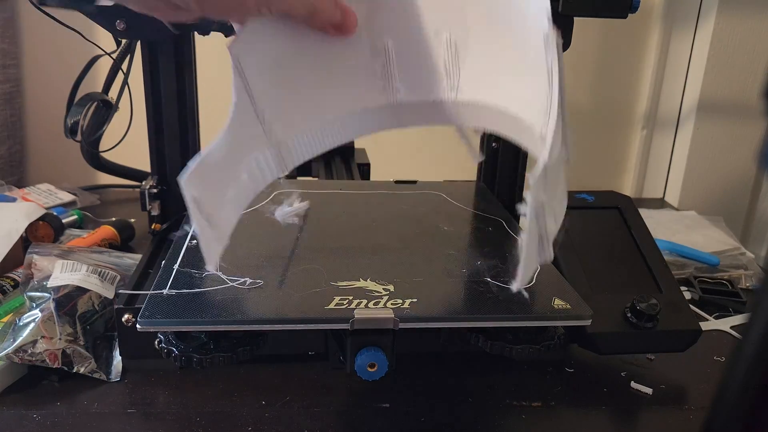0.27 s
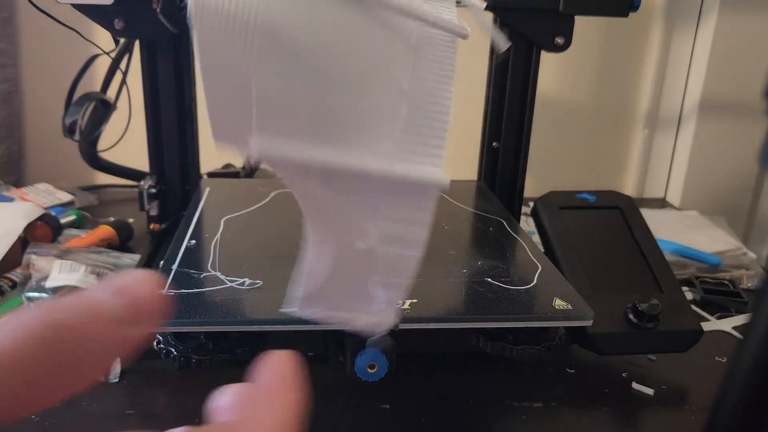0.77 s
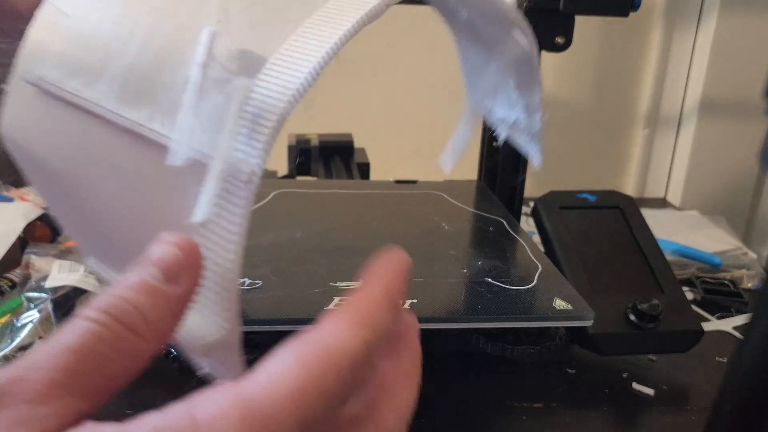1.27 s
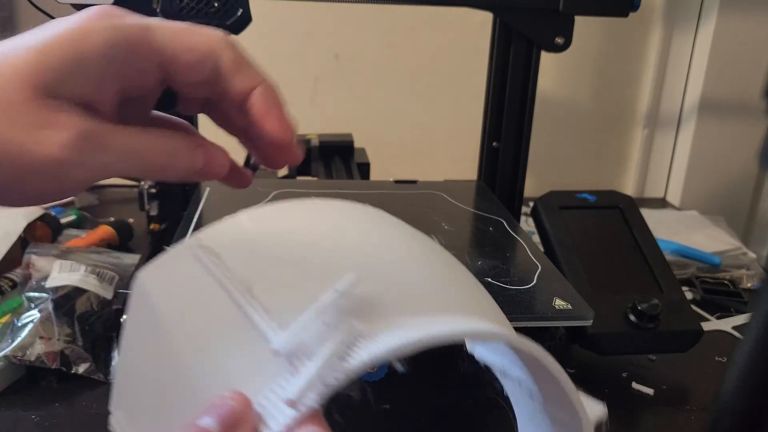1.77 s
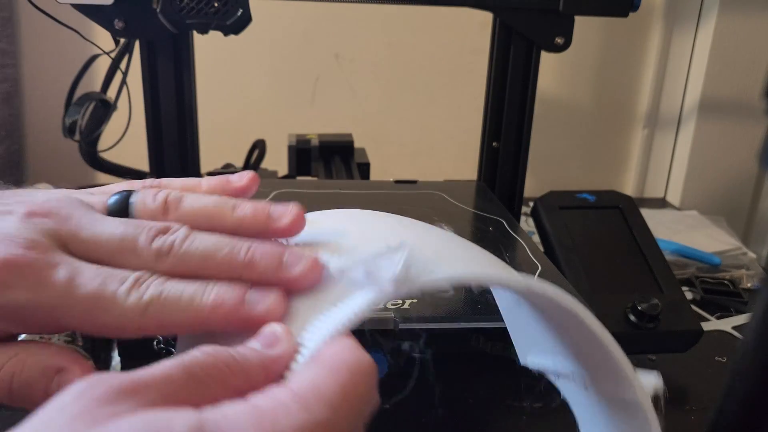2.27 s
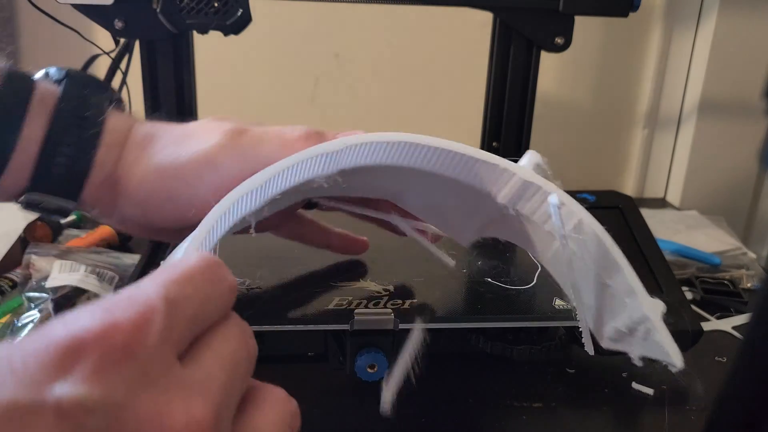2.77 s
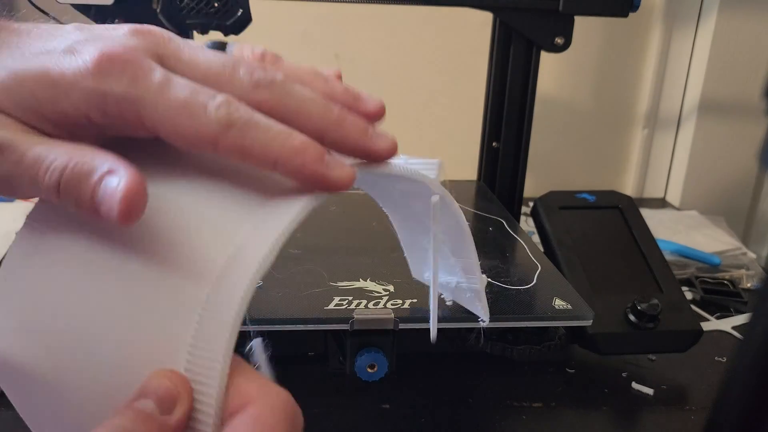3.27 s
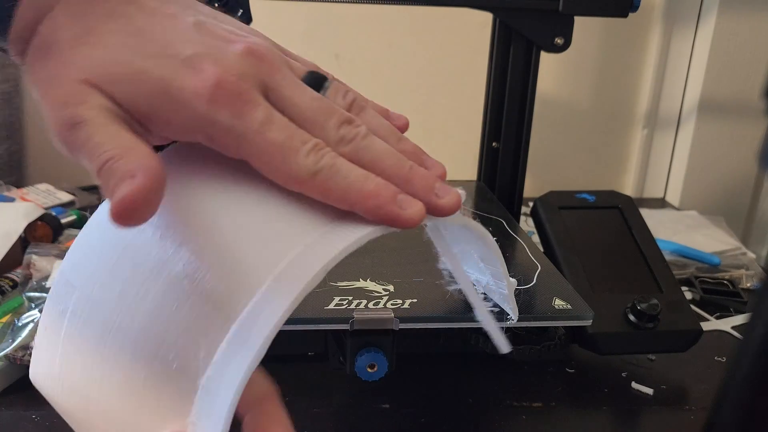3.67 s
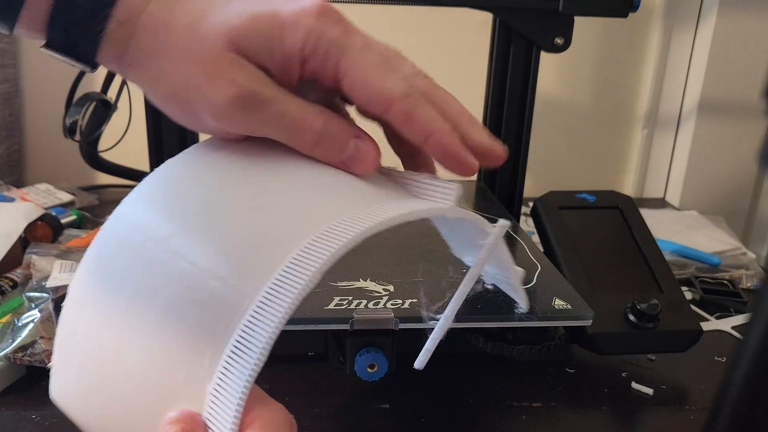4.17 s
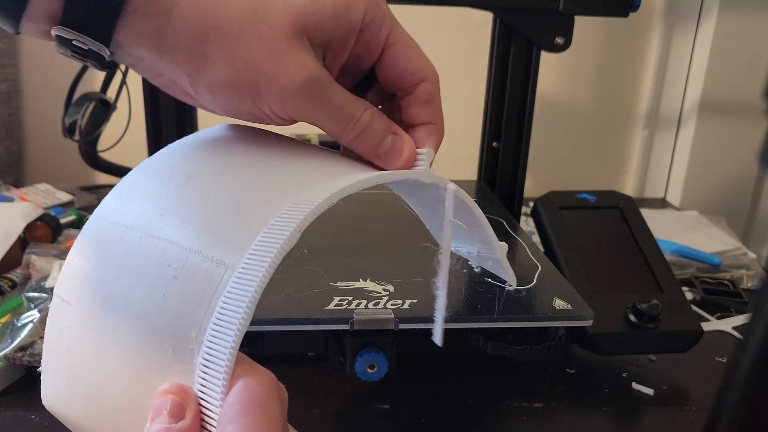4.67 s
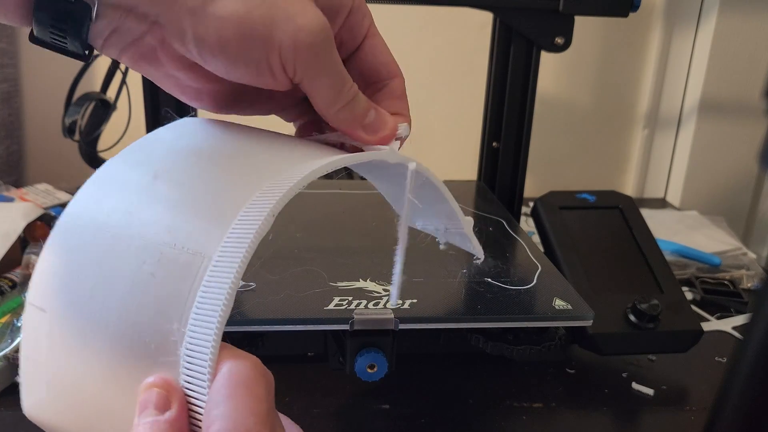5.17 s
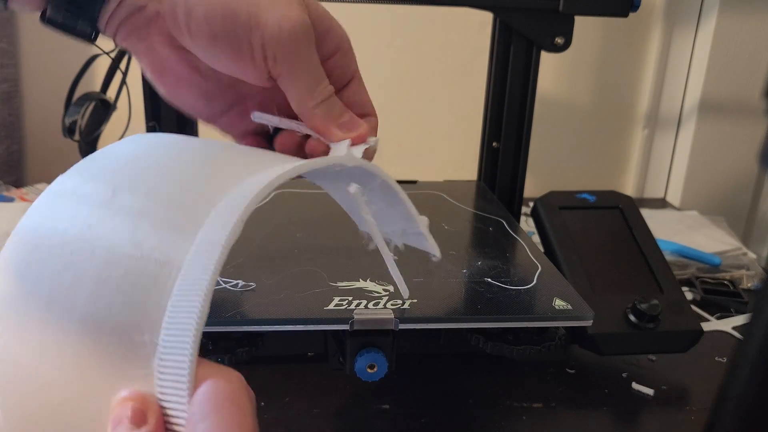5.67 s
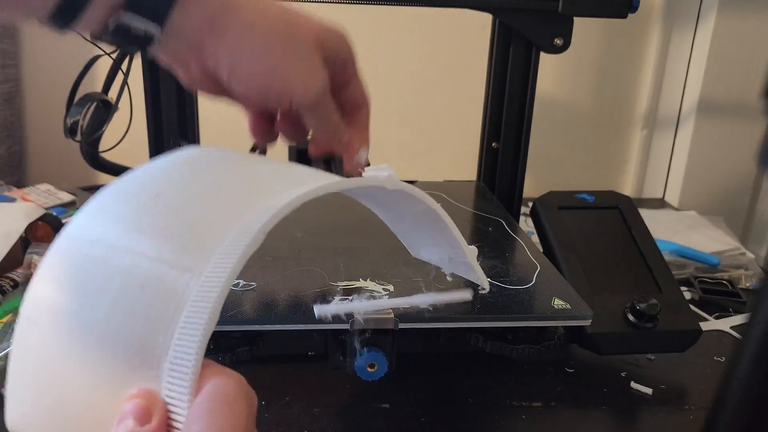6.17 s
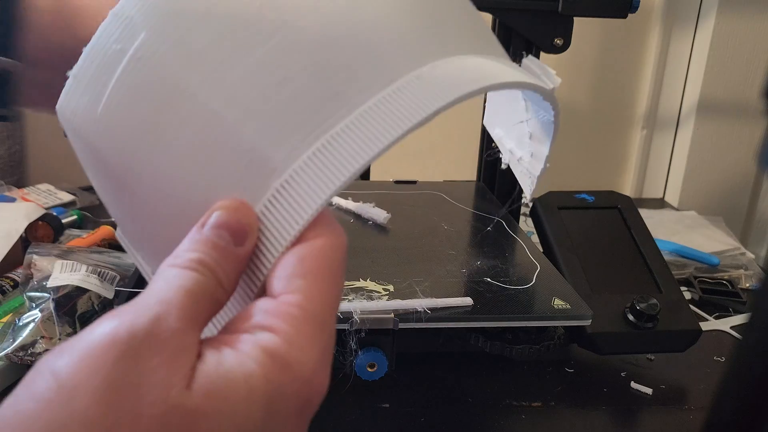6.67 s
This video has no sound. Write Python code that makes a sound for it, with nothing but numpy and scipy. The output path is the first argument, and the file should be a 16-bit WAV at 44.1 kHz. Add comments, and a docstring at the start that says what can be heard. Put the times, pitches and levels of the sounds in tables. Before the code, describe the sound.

Hands flex a thin plastic shell up close in a small room, brittle support strands ticking, snapping and finally cracking in loud, sharp bursts.

```python
"""Hands turn a thin printed plastic shell up close; the small room rumbles, hums and whines throughout.
Support strands tick at first, snap near 1.1 s and again from 2.3 to 3.4 s: clicks and bursts ring strand and shell.
Skin strokes hiss as rough noise and fingertips thump as decaying sines; ticks then thin out.
From 4.3 to 5.3 s a metal wrist strap clinks faintly, as narrow ringing noise.
The hardest snaps run from 5.2 to 6 s, then small cracks close the scene. The hands sit a little to the left."""
import sys
import numpy as np
from scipy import signal
from scipy.fft import rfft, irfft, next_fast_len
from scipy.io import wavfile
from scipy.ndimage import uniform_filter1d, map_coordinates

SR = 44100
rng = np.random.default_rng(int(sys.argv[2]) if len(sys.argv) > 2 else 0)


def store_pcm(level_fs):
    """Save levels as 16-bit WAV."""
    pcm = np.round(np.clip(level_fs, -1, 1) * 32767).astype(np.int16)
    wavfile.write(sys.argv[1], SR, np.atleast_2d(pcm).T)


N = 305613  # length [samples]


def amp(db):
    """Gain of a level in dB."""
    return 10 ** (np.asarray(db) / 20)


def unit(x):
    """x scaled to rms 1."""
    return x / np.sqrt(np.mean(x ** 2) + 1e-20)


def lean_left(db):
    """Channel gains: left up by db, right down by db."""
    return amp([[db], [-db]])


def along(points, hz):
    """(frequency, value) points read on a log frequency axis."""
    f, v = np.transpose(points)
    return np.interp(np.log(hz + 1), np.log(f + 1), v)


def wobble(rate):
    """A smooth random curve with rate knots a second."""
    knots = rng.standard_normal(int(N * rate / SR) + 4)
    return map_coordinates(knots, [np.arange(N) * rate / SR])


def filtered(x, response):
    """x shaped by a response given as a function of frequency."""
    m = next_fast_len(x.shape[-1] + 8192)
    spectrum = rfft(x, m) * response(np.fft.rfftfreq(m, 1 / SR))
    return irfft(spectrum, m)[..., :x.shape[-1]]


def colour(points):
    """Response that follows (frequency, level) points."""
    return lambda hz: amp(along(points, hz))


def resonances(modes):
    """Causal response of (frequency, width, level) modes, with alternating signs."""
    def response(f):
        total = 0
        for k, (centre, width, db) in enumerate(modes):
            damping = 1j * f * width
            total = total + (-1) ** k * amp(db) * damping / (centre ** 2 - f ** 2 + damping)
        return total
    return response


def pair(length, alike):
    """Left and right noise sharing the fraction alike of their power."""
    common, left, right = rng.standard_normal((3, length))
    alike = np.clip(alike, 0, 1)
    return np.sqrt(alike) * common + np.sqrt(1 - alike) * np.array([left, right])


# Relative spectrum of the room noise: (frequency [Hz], level [dB per Hz])
AIR_SPECTRUM = [(20, -19), (60, 1), (114, -3), (183, -9), (280, -2), (330, -15.5), (500, -12), (760, -18),
                (850, -23.5), (1230, -21), (2040, -25), (3100, -23.5), (5700, -34), (7400, -28),
                (9700, -43.5), (15000, -32.5), (15850, -42.5), (16150, -76)]
# Left-right correlation of the room noise: (frequency [Hz], correlation [-1 to 1])
AIR_LIKENESS = [(60, 1), (290, 0.81), (700, 0.055), (1500, 0.011), (15000, 0.28)]
# Room noise over time, before the trim: (time [s], level [dB])
RUMBLE_LEVEL = [(0.0, -57), (0.63, -61.5), (3.4, -62.5), (3.57, -57.5), (4.11, -62.5), (4.86, -64.5),
                (5.4, -62.5), (5.98, -61), (6.43, -65.5), (6.93, -63.5)]
# Fuzzy hum bands, before waver and panning: (frequency [Hz], width [Hz], level [dB rms])
HUM_BANDS = [(55.7, 8, -68.5), (113.2, 7.2, -72.5), (216.5, 24, -77.5), (269, 50, -87.5),
             (368.5, 28, -74.5)]
AIR_TRIM_DB, HUM_WAVER_DB = 1.0, 3.5
WHINE_HZ, WHINE_DB = 723, -75  # level before waver and panning


def room_noise():
    """Rumble near mono with wider hiss above; resonant noise bands hum and one faint sine whines."""
    t = np.arange(N) / SR

    def mid_side(hz):
        angle = np.arccos(np.clip(along(AIR_LIKENESS, hz), -1, 1)) / 2
        return colour(AIR_SPECTRUM)(hz) * [np.cos(angle), np.sin(angle)]

    mid, side = filtered(rng.standard_normal((2, N)), mid_side)
    air_db = np.interp(t, *np.transpose(RUMBLE_LEVEL)) + AIR_TRIM_DB
    air = amp(air_db) * unit(np.array([mid + side, mid - side]))
    hum = 0
    for hz, width, db in HUM_BANDS:
        band = filtered(pair(N, 0.86), lambda f: resonances([(hz, width, 0)])(f) ** 2)
        hum = hum + amp(db + HUM_WAVER_DB * wobble(6)) * unit(band)
    whine_level = amp(WHINE_DB + 1.7 * wobble(5.8))
    whine = whine_level * np.sin(2 * np.pi * WHINE_HZ * t + 0.64 * wobble(19))
    return (air + hum + whine) * lean_left(1.2)


# Decay of the room's answer: (frequency [Hz], t60 [s])
WALL_DECAY = [(200, 0.25), (2000, 0.15), (8000, 0.15), (16000, 0.16)]


def walls(x):
    """Each frequency of the reverb dies at its own speed; every fifth of a second meets a new noise tail."""
    out, step = np.zeros((2, N + SR)), SR // 5
    for start in range(0, N, step):
        hz, t, z = signal.stft(rng.standard_normal((2, SR // 3)), SR, nperseg=256)
        decay = amp(-60 * t / along(WALL_DECAY, hz)[:, None])
        tail = signal.istft(z * decay, SR, nperseg=256)[1]
        wet = signal.fftconvolve(x[:, start:start + step], tail / np.linalg.norm(tail[0]), axes=1)
        out[:, start + 150:][:, :wet.shape[1]] += wet  # delayed by 150 samples
    return out[:, :N]


# Links of the wrist strap touching, before panning: (time [s], level [dB])
LINK_TOUCHES = [(4.324, -52.5), (4.4, -61), (4.443, -55.5), (4.694, -59), (4.763, -52), (4.785, -52),
                (4.912, -59), (4.951, -49), (4.975, -47.5), (5.0084, -51), (5.013, -38), (5.034, -59),
                (5.14, -51.5), (5.282, -56), (5.297, -46), (5.344, -46)]
LOWER_LINK_HZ, UPPER_LINK_HZ, UPPER_DB = 11660, 13040, -17  # the upper ring is quieter
LINK_T60_S, LINK_RISE_S = 0.072, 0.0012


def strap():
    """Small metal links touch: short decaying scrapes let through two high, narrow rings of noise."""
    scrape, t = np.zeros(N + SR), np.arange(SR // 5) / SR
    for s, db in LINK_TOUCHES:
        touch = amp(db - 60 * t / LINK_T60_S) * (1 - np.exp(-t / LINK_RISE_S))
        scrape[round(s * SR):][:len(t)] += touch

    def ring(hz):
        return unit(filtered(pair(N, 0.37), lambda f: resonances([(hz, 330, 0)])(f) ** 2))

    rings = ring(LOWER_LINK_HZ) + amp(UPPER_DB) * ring(UPPER_LINK_HZ)
    return scrape[:N] * rings * lean_left(3)


# Finger thumps; level of the main bend before onset and panning, t60 held to 0.02 s or more:
# (time [s], level [dB], pitch [Hz], t60 [s])
FINGER_THUMPS = [(0.038, -45.5, 172.5, 0.31), (0.09, -38.5, 179, 0.12), (1.108, -41, 69, 0.22),
                 (1.124, -34.5, 140, 0.12), (2.06, -41.5, 194, 0.18), (2.13, -43.5, 200, 0.24),
                 (2.479, -32, 191.5, 0.16), (2.531, -44, 97.6, 0.38), (3.388, -48, 196.4, 0.15),
                 (3.638, -45, 116, 0.059), (3.973, -48, 271, 0.15), (4.1, -51.5, 97, 0.52),
                 (4.221, -41.5, 72.7, 0.14), (5.055, -48, 72.7, 0.066), (5.194, -26.5, 166, 0.036),
                 (5.236, -25.5, 100, 0.027), (5.425, -36.5, 271, 0.061), (5.612, -34.5, 250, 0.063),
                 (6.015, -29, 253, 0.047), (6.406, -47, 188, 0.082)]


def thumps():
    """Soft finger pads set off low bends of the shell: decaying sines at three related pitches."""
    out, t = np.zeros(N + SR), np.arange(SR // 3) / SR
    for s, db, hz, t60 in FINGER_THUMPS:
        phase = 2 * np.pi * hz * t
        bend = np.sin(phase) + 0.497 * np.sin(0.614 * phase + rng.uniform(0, 7.7))
        # a shorter upper bend
        bend += 0.5 * amp(-60 * t / 0.078) * np.sin(2.4 * phase + rng.uniform(0, 2))
        envelope = amp(db - 60 * t / max(t60, 0.02)) * (1 - np.exp(-t / 0.0025))
        out[round(s * SR):][:len(t)] += envelope * bend
    return out[:N] * lean_left(1.4)


# Strokes of skin and flexing of the shell; rise held to 0.003 s or more, treble and body relative to scrape:
# (start [s], rise [s], hold [s], fading [dB per s], scrape [dB], treble [dB], body [dB])
SKIN_STROKES = [(0, 0.017, 0.032, 154, -50.5, -10.5, -4), (0.29, 0.58, .1, 125, -66, -17, -3),
                (0.974, 0.099, 0.015, 138, -42.5, -6, -6.5), (1.344, 0.23, 0.04, 103, -68, -10, -10),
                (1.617, 0.017, .02, 139, -61.5, -4.5, -5), (1.93, 0.13, 0.068, 153.5, -55, -11.5, -9.5),
                (2.27, 0.0096, 0.009, 499.5, -47.5, 0.5, 0), (2.359, .09, .06, 81.5, -47.5, 1, -10.5),
                (2.548, .08, .06, 71.5, -48.5, 0, -15), (2.876, 0.024, .02, 202, -66.5, -10, -7),
                (3.241, 0.047, 0.0095, 305, -57.5, -4, -7.5), (3.364, 0.0069, .02, 98.5, -66, -10, 1),
                (3.405, 0.022, 0.018, 156.5, -62.5, -2.5, 1), (3.482, 0.026, .15, 108, -54.5, -11.5, 0.5),
                (3.8, 0.037, 0.036, 199.5, -56.5, -9, -8.5), (3.942, 0.032, 0.11, 148.5, -59.5, -12, -2.5),
                (4.173, 0.048, 0.0098, 252, -58, -2, -3), (4.264, 0.12, 0.033, 193, -56.5, -4, -9),
                (4.995, 0.04, 0.036, 77, -67, 4, -10), (5.164, 0.021, 0.1, 81, -51.5, -7, -9),
                (5.423, 0.01, 0.05, 57.5, -47.5, -2.5, -14.5), (5.598, 0.0062, 0.016, 83.5, -62, 7, -10),
                (5.831, .02, 0.11, 300, -55, -1, -13), (5.996, .02, 0.091, 243, -53, -3.5, -8),
                (6.193, 0.03, 0.016, 149, -66, 4, -5), (6.417, 0.02, 0.038, 295, -71.5, 5.5, 2.5),
                (6.673, 0.01, 0.0072, 400.5, -63, -2, -3)]
SWELL_DB = 24  # depth of the rise
RASP_DB, RASP_FOLLOWS = -1, 0.59  # rasp against scrape, and how far it follows the treble


def strokes():
    """Gains of scrape, rasp, fizz and body: each stroke swells, holds and fades; powers add."""
    t, power = np.arange(N) / SR, np.zeros((4, N))
    for s, rise, hold, fading, db, treble_db, body_db in SKIN_STROKES:
        top = s + max(rise, 0.003)
        swell_db = np.interp(t, [s, top], [-SWELL_DB, 0], left=-120)
        shape_db = swell_db - fading * (t - top - max(hold, 0)).clip(0)
        rasp_db = RASP_DB + RASP_FOLLOWS * treble_db
        layers_db = np.array([[0], [rasp_db], [treble_db], [body_db]])
        power += amp(db + shape_db + layers_db) ** 2
    return np.sqrt(power)


# Relative spectra of skin on ridges, its rasp and its fizz: (frequency [Hz], level [dB per Hz])
SKIN_SPECTRUM = [(800, -120), (1200, -62.5), (1530, -16), (1830, 0), (2350, -3), (3110, 1.5), (3600, -4),
                 (4500, -120)]
RASP_SPECTRUM = [(3000, -120), (3600, 4), (4500, 2.5), (5300, -1.5), (6300, -5.5), (7500, -120)]
FIZZ_SPECTRUM = [(4500, -120), (6000, -10), (6800, -5), (7700, -0.5), (8800, -11), (9700, -19),
                 (10500, -17), (12900, -11), (14700, -8.5), (15850, -17), (16150, -65.5)]
# Relative spectrum of the shell body, rubbed or cracked: (frequency [Hz], level [dB])
BODY_SPECTRUM = [(150, -120), (280, -2), (480, -7.5), (700, -6.5), (1050, -1), (1350, 1.5), (2200, -120)]
SLIPS_PER_S, SLIP_T60_S = 300, 0.015


def rubbing():
    """Skin catches on the layer ridges: noise roughened by tiny slips of uneven size, in drifting patches."""
    slips = (rng.random(N) < SLIPS_PER_S / SR) * amp(2.7 * rng.exponential(size=N).clip(0, 3))
    slip_decay = amp(-60 * np.arange(SR // 30) / SR / SLIP_T60_S)
    grain = 1 + 0.6 * signal.fftconvolve(slips, slip_decay)[:N]
    pressure = amp(2.2 * wobble(35))
    z = signal.stft(pair(N, 0.16) * grain * pressure, nperseg=256)[2]
    # patches of level, smoothed over frequency and then over time
    patches = uniform_filter1d(rng.standard_normal(z.shape[1:]), size=3, axis=0)
    patches = uniform_filter1d(patches, size=12, axis=1)
    noise = signal.istft(z * amp(0.78 * unit(patches)), nperseg=256)[1][:, :N]
    out = 0
    for spectrum, gain in zip((SKIN_SPECTRUM, RASP_SPECTRUM, FIZZ_SPECTRUM, BODY_SPECTRUM), strokes()):
        out = out + gain * unit(filtered(noise, colour(spectrum)))
    return out * lean_left(2.5)


TICKS = 150  # tiny fibres that part while the shell is rubbed
TICK_DB, TICK_SPREAD_DB = 2.5, 3  # offset from the scrape; scale of the random spread


def ticks():
    """Fibres part at random as faint cracks, more and stronger where the stroke is strong."""
    u, scrape = rng.random((TICKS, 4)), strokes()[0]
    chance = np.sqrt(scrape)
    at = np.interp(u[:, 0], np.cumsum(chance) / chance.sum(), np.arange(N)).astype(int).clip(400)
    db = 20 * np.log10(scrape[at]) + TICK_DB - TICK_SPREAD_DB * np.log(u[:, 1] + 0.073)
    pitch = 1000 * 5 ** u[:, 2]  # 1 to 5 kHz
    pan_db = 12 * u[:, 3]
    return [(i / SR, level, hz, -18, -8, pan) for i, level, hz, pan in zip(at, db, pitch, pan_db)]


# Cracks of the strands; level is the ring's peak before panning, body and treble are relative to it:
# (time [s], level [dB], strand pitch [Hz], shell body [dB], splinter treble [dB], left over right [dB])
STRAND_CRACKS = [(0.028, -36.5, 2760, -7, -10, 1), (0.139, -41, 3000, -4.5, -29, 4.5),
                 (0.1875, -40.5, 2120, -11, -11, 8.5), (0.2836, -52, 1770, -6, -27, 18),
                 (0.3925, -42, 1010, -16, 0.5, 8.5), (0.4268, -58.5, 1220, 6, -28, 12),
                 (0.5279, -37, 1040, -24, -8, 10.5), (0.5793, -44.5, 1000, -19, -1, 4.5),
                 (0.6385, -39.5, 1930, -9.5, -9, 8), (0.7317, -43, 1860, -6, -6.5, 8),
                 (0.7943, -45.5, 2230, -11, -20, 1), (0.9045, -62.5, 1210, -10, 10, 6.0),
                 (0.9804, -37.5, 4400, -27, -5, 6.0), (1.0178, -30, 2295, -12.5, -14, 6.5),
                 (1.0509, -34, 1014, -26, -19, 6.0), (1.0783, -32, 4780, -22, 3.5, 11),
                 (1.0951, -29, 3790, -31, -14, 5), (1.1091, -22, 2267, -16, -32, 2),
                 (1.129, -13.5, 3280, -14.5, -6.5, 7), (1.1336, -17, 1190, -10, -10, 4.5),
                 (1.1934, -35.5, 1010, -11, -24, 8.5), (1.424, -52.5, 3280, -10, -7, 9.5),
                 (1.4663, -57.5, 3300, -17, -23, 13), (1.6169, -43, 2970, -20, -10, 23.5),
                 (1.7613, -51.5, 3300, -12, -9, 13), (1.8052, -38.5, 3300, -12, -19, 10.5),
                 (1.8462, -35, 3620, -12.5, -11, 6.0), (1.912, -49.5, 1900, -10, -11, 8.5),
                 (1.935, -34.5, 4780, -13.5, -10.5, 10.5), (1.9865, -37.5, 2535, -12, -5.5, 7.5),
                 (2.0644, -40, 1863, -4, -9, 4.5), (2.1155, -43, 3100, -4.5, -23, 3.5),
                 (2.2803, -19.5, 3050, -23, -12.5, 9.5), (2.3566, -48, 2726, -12, -5.5, 13),
                 (2.4128, -35, 2920, -19, -4, 7.5), (2.4413, -24, 3666, -31, -1, 10),
                 (2.4733, -30.5, 939, -9, -9, 8), (2.4905, -31, 3480, -8, -10, 13.5),
                 (2.5113, -32.5, 3248, -19, -8, 4), (2.5717, -31, 5096, -31, -22, 7),
                 (2.6142, -32.5, 5080, -33, -15, 8), (2.6593, -28, 3146, -22, -5, 1.5),
                 (2.7288, -32, 2950, -13.5, -10, 17.5), (2.7347, -22, 2910, -30, -6.5, 3.5),
                 (3.0116, -47, 3020, -29, -15, 14), (3.056, -42, 3460, -9, 7.5, 7),
                 (3.1331, -40.5, 1210, -7.5, 2, 5.0), (3.192, -47.5, 2120, -12, -4, 9),
                 (3.262, -47, 2480, -21, -3.5, 13), (3.3911, -22.5, 2730, -10, -16, 11),
                 (3.3977, -35, 1030, 5, -16, 6.0), (3.4214, -31.5, 1040, -14, -19, 5),
                 (3.5017, -31, 2200, -29, -7.5, 0), (3.5252, -38.5, 980, -3, 3.5, 3.5),
                 (3.5448, -40, 1036, -14, -6, 5), (3.6257, -42, 1030, -3, -27, 8.0),
                 (3.6397, -32, 1082, -6.5, -19, 11), (3.8172, -45, 3140, -16, 3, 9.0),
                 (3.874, -41.5, 3070, -9, -8, 8.5), (3.9567, -48.5, 1330, -9, -8, 13),
                 (3.9811, -41.5, 4670, -10, -2.5, 3), (4.2072, -43.5, 1085, -6, -15, 6.5),
                 (4.2254, -42.5, 1023, -20, -21, 14), (4.3623, -43, 1926, -26.5, -18.5, 18),
                 (4.3906, -40, 1990, -25, -26, 6), (4.4769, -45.5, 3800, -12, 1.5, 10.5),
                 (4.667, -59, 2100, -7, 5, 8), (4.753, -57.5, 3130, -11, -3, 17),
                 (4.8022, -62, 1210, -4, 16, 7), (4.8617, -63, 1250, -9.5, 6.5, 12),
                 (4.9098, -60.5, 1090, -8, 9, 8), (4.9425, -53, 2020, -14, 2, 10),
                 (4.9678, -53.5, 3080, -16.5, 7.5, 6.5), (5.0559, -17.5, 1730, -20.5, -9, 8.5),
                 (5.1996, -3, 3150, -22, -10, 0), (5.2044, -10.5, 2440, -15, -13.5, 10.5),
                 (5.2206, -9, 3170, -19.5, -5, 11), (5.2248, -16.5, 3000, -17.5, -3.5, 5),
                 (5.236, -16.5, 3380, -32, -1.5, 3), (5.2564, -23.5, 3070, -29.5, 6, 7.5),
                 (5.3608, -17, 2884, -28, -4, 7), (5.4135, -33.5, 3040, -23, 3.5, 10.5),
                 (5.4282, -8.5, 3010, -18, -6.5, 4.5), (5.4346, -4.5, 3680, -26.5, -2, 1),
                 (5.4399, -15, 3030, -13.5, 0, 7), (5.4449, -10.5, 1757, -12.5, -21, 1.5),
                 (5.5578, -38.5, 3620, -17.5, -5.5, -4.5), (5.5809, -20.5, 2996, -22.5, 1.5, 8.5),
                 (5.6151, -13, 2050, -12, 1.5, 9.5), (5.626, -23, 3280, -12.5, -14, -0.5),
                 (5.638, -22.5, 3130, -30.5, -8.5, 3.5), (5.6436, -17.5, 3680, -25, -3.5, -2),
                 (5.6547, -17, 4000, -33, 0, 6.0), (5.6604, -13.5, 3260, -13, 2, 7.5),
                 (5.6621, -14.5, 2470, -26, -4, -0.5), (5.7463, -45.5, 4290, -19.5, 12, 6),
                 (5.8176, -29, 3120, -34, -4, 8.5), (5.8247, -18, 2550, -28, 4, 5.5),
                 (5.8465, -13.5, 3330, -24.5, -3, 7), (5.8559, -22, 3200, -24, -20.5, 13.5),
                 (5.9217, -27, 3030, -37, 2, 8.5), (5.9323, -24.5, 2933, -17.5, -18, 6.5),
                 (5.9406, -29.5, 3520, -22, -18, 8.5), (5.9518, -34.5, 3180, -34, -11, 11),
                 (6.0207, -26.5, 3110, -5, 2, 11), (6.0253, -17, 2950, -40, -30, 9.5),
                 (6.0358, -36, 2530, -10, 10.5, 2.5), (6.0518, -30, 3660, -7, -15, 0),
                 (6.0768, -45, 3604, -18, 6.5, 11), (6.2294, -42.5, 1960, -8.5, 7.5, 8.5),
                 (6.2612, -32, 3670, -39, -5, 5.5), (6.3135, -50, 2530, -10, 9.5, 5),
                 (6.332, -51, 1890, -10, 5.5, 5.5), (6.4052, -37, 1110, -12, -28.5, 12),
                 (6.4512, -47.5, 2850, -13, 2.5, 10.5), (6.4844, -56, 1194, -7, 2, 8.0),
                 (6.6256, -46.5, 1030, -9, -8, 8.5), (6.667, -51.5, 2750, -10, 11, 1.5),
                 (6.6963, -40, 999, -12, -17, 8)]
# Ringing modes of the shell, before each crack's random offsets: (frequency [Hz], width [Hz], relative level [dB])
SHELL_MODES = [(1060, 54, -8), (1386, 160, -12.5), (1740, 440, 1.5), (2295, 530, 7), (3194, 270, 5.5),
               (3417, 1230, -11)]
# Relative spectrum of the flying splinters: (frequency [Hz], level [dB])
SPLINTER_SPECTRUM = [(4500, -120), (5200, -7), (6800, 13), (7900, 16.5), (9000, 3.5), (9700, -5.5),
                     (10600, 2), (12200, 7), (14000, 8.5), (15900, 3), (16150, -37.5), (16900, -47.5)]
CLICK, CLICK_T60_S = 1.6, 0.005  # click gain relative to the burst; its decay
CRACK_T60_S, ONSET_S, LEAD_IN_S = 0.039, 0.002, 0.004  # burst decay, its rise, silence before the click
STRAND_WIDTH, STRAND_DB = 0.2, 9  # width as a share of pitch; level among the shell modes
EDGE_DB, EDGE_FOLLOWS = -4.5, 0.51  # the crisp edge, and how far it follows the treble


def cracks():
    """A fracture is a click and noise burst: it rings strand and shell, shakes the body, throws splinters."""
    out, t = np.zeros((2, N + SR)), np.arange(SR // 8) / SR - LEAD_IN_S
    onset = 1 - np.exp(-t.clip(0) / ONSET_S)
    click = CLICK * (t >= 0) * amp(-60 * t / CLICK_T60_S)

    def burst(alike, share):
        return pair(len(t), alike) * (click + onset * amp(-60 * t / (share * CRACK_T60_S)))

    for s, db, hz, body_db, treble_db, pan_db in list(STRAND_CRACKS) + ticks():
        # each spot drives the modes differently
        struck = resonances([(c, w, level + rng.normal(0, 3.9)) for c, w, level in SHELL_MODES])
        strand = resonances([(hz, STRAND_WIDTH * hz, STRAND_DB)])
        ring = filtered(burst(0.63, 1.0), lambda f: struck(f) + strand(f))
        body = filtered(burst(0.86, 1.32), colour(BODY_SPECTRUM))  # the low bending lasts longer
        edge = filtered(burst(0.59, 0.81), colour(RASP_SPECTRUM))
        treble = filtered(burst(0.49, 1.0), colour(SPLINTER_SPECTRUM))
        edge_db = EDGE_DB + EDGE_FOLLOWS * treble_db
        layers = zip((ring, body, edge, treble), (0, body_db, edge_db, treble_db))
        crack = sum(amp(db + level) * x / np.abs(x).max() for x, level in layers)
        out[:, round((s - LEAD_IN_S) * SR):][:, :len(t)] += crack * lean_left(pan_db / 2)
    return out[:, :N]


LEAD_S = 0.00019  # the left channel hears the hands first
WALLS_DB = -10


def scene():
    """The hands, nearer the left, in the room."""
    hands = strap() + thumps() + rubbing() + cracks()
    sides = np.array([[1], [-1]])  # half the lead forward on the left, half back on the right
    near = filtered(hands, lambda hz: np.exp(1j * np.pi * hz * LEAD_S * sides))
    return room_noise() + amp(WALLS_DB) * walls(hands) + near


TOP_HZ = 16950


def record(dry):
    """A steep band limit removes everything from TOP_HZ up."""
    return filtered(dry, lambda hz: hz < TOP_HZ)


dry = scene()
out = record(dry)
store_pcm(out)
```